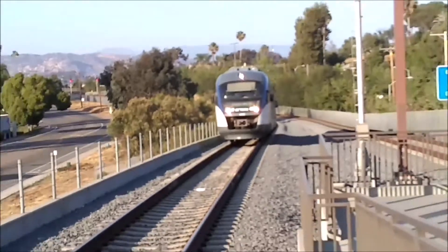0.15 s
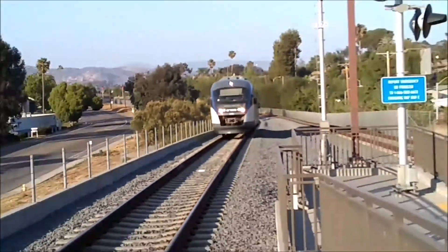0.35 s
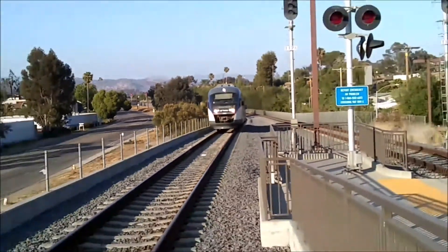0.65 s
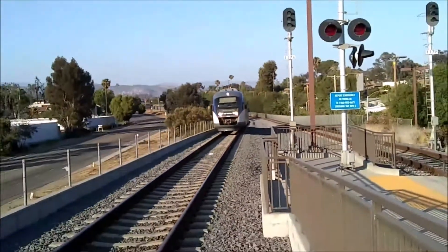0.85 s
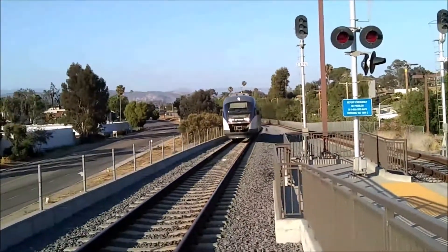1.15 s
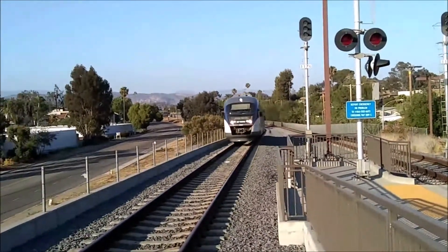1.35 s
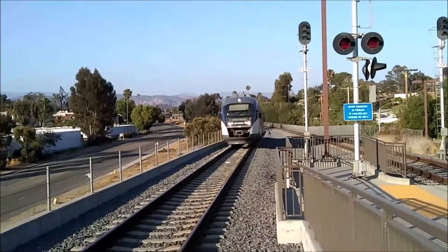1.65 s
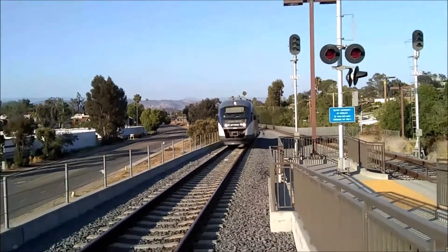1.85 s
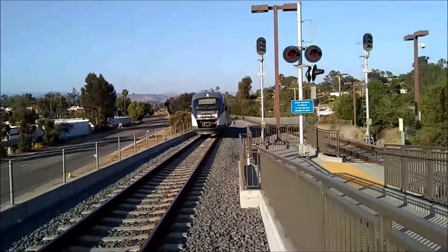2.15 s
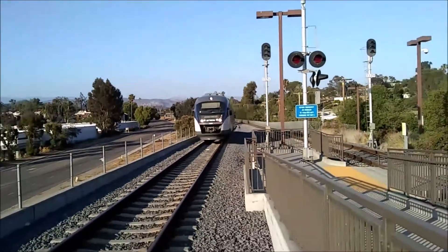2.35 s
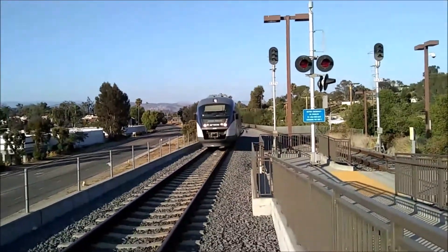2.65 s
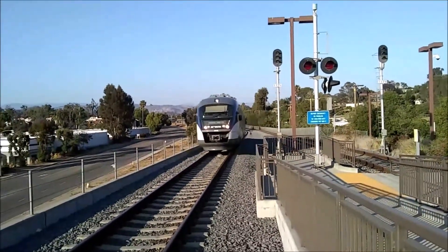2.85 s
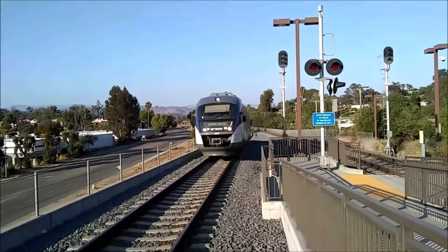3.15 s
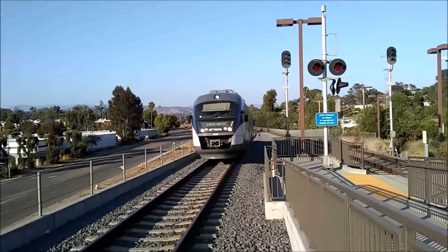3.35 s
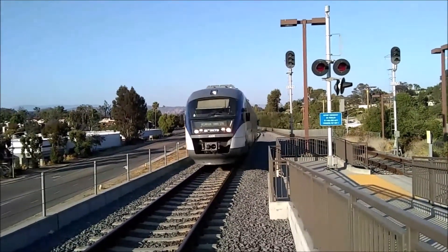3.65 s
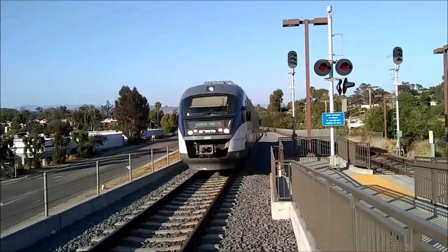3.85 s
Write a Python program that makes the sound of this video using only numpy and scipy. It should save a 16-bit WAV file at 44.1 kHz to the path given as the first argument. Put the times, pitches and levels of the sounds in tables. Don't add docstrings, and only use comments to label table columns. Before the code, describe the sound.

A train horn dominates the ending: a loud, brassy, mid-pitched blast from about 3.25 to 3.65 seconds, then a second from 3.7, still sounding at the cut, with dull faint echoes. Before it, wind thumps the microphone, mostly left, strongest near 0.5-1 second, over low diesel drone and distant traffic. Brief air hisses come around 2.3 and 2.9; rolling hiss and metallic wheel clatter swell from 2.4.

```python
import sys
import numpy as np
from scipy import signal
from scipy.fft import rfft, irfft, next_fast_len
from scipy.io import wavfile
from scipy.ndimage import uniform_filter1d

SR = 44100
rng = np.random.default_rng(int(sys.argv[2]) if len(sys.argv) > 2 else 0)


def voltage_ratio(level):
    return 10 ** (np.asarray(level, float) / 20)


def dump_mix(stems):
    frames = np.atleast_2d(stems).T
    limited = np.clip(frames, -1, 1)
    pcm = np.round(limited * 32767).astype(np.int16)
    wavfile.write(sys.argv[1], SR, pcm)


N = 176400


def rms_one(x):
    return x / np.sqrt(np.mean(x ** 2) + 1e-20)


def in_time(rows):
    s, *columns = np.transpose(rows)
    return [np.interp(np.arange(N) / SR, s, column) for column in columns]


def at_hz(points, hz):
    table_hz, values = np.transpose(points)
    return np.interp(np.log(hz), np.log(table_hz), values)


def pan(db):
    return voltage_ratio(np.multiply.outer([.5, -.5], db))


def filtered(x, order, hz, kind="low"):
    return signal.sosfilt(signal.butter(order, hz, kind, fs=SR, output="sos"), x)


def drift(rate):
    r = np.exp(-80 * np.pi * rate / SR)
    white = rng.standard_normal(N // 40 + 2002)
    slow = signal.lfilter([1], [1, -2 * r, r * r], white)[2000:]
    return np.interp(np.arange(N) / 40, np.arange(len(slow)), rms_one(slow))


def resonance(x, hz, width_hz):
    r = np.exp(-np.pi * width_hz / SR)
    poles = [1, -2 * r * np.cos(2 * np.pi * hz / SR), r * r]
    return signal.lfilter([(1 - r * r) / 2, 0, (r * r - 1) / 2], poles, x)


# (f/Hz, left-right likeness [-1..1])
LIKENESS = [(100, 1), (600, 0.66), (1300, -0.16), (2100, -0.66), (3200, 0.39), (4300, -0.33), (5600, 0.38),
            (8000, -0.19)]


def pair(white, hz):
    alike = np.clip(at_hz(LIKENESS, hz), -1, 1)
    common = np.sqrt(1 + alike) * white[0]
    opposed = np.sqrt(1 - alike) * white[1] * np.array([[1], [-1]])
    return common + opposed


def banded_noise(spectrum, pan_db=0):
    patchy_db = .7
    out, together = 0, drift(6)
    edges = 40 * 2 ** np.arange(0, 8.9, .4)
    white = rng.standard_normal((2, 2, N))
    for k, (low, high) in enumerate(zip(edges, edges[1:])):
        band = filtered(white[k % 2], 2, [low, high], "band")
        hz = np.sqrt(low * high)
        level_db = at_hz(spectrum, hz) + patchy_db * (0.5 * together + drift(18))
        sides = pan(pan_db * min(hz / 10000, 1) + np.zeros(N))
        out = out + voltage_ratio(level_db) * pair(band, hz) * sides
    return rms_one(out)


# (t/s, level/dB, left port over right/dB)
GUSTS = [(0, -49.5, 6), (.2, -49.5, 14), (.35, -60.5, -3), (.86, -43.5, 10), (1.1, -54, 9),
         (1.4, -46.5, -6), (1.75, -46, 15), (2.05, -50.5, -9.5), (2.3, -49.5, -1), (2.75, -50, -2),
         (3.1, -49.5, -6), (3.4, -53.5, 11.5), (4.0, -64.5, 1)]
# (f/Hz, level/dB per Hz)
WIND = [(20, -33.5), (45, -2), (90, -2.5), (170, -8), (300, -18.5), (600, -47.5), (1200, -50),
        (2500, -85.5)]
WIND_GAIN_DB, WIND_LUMP_DB, WIND_LUMPS_PER_S = 18.5, 3.2, 30


def wind():
    level_db, pan_db = in_time(GUSTS)
    lumps = np.array([voltage_ratio(WIND_LUMP_DB * drift(WIND_LUMPS_PER_S)) for side in (0, 1)])
    hz = np.maximum(np.arange(N // 2 + 1) * SR / N, 1)
    low = irfft(rfft(lumps * rng.standard_normal((2, N))) * voltage_ratio(at_hz(WIND, hz)), N)
    return rms_one(low) * voltage_ratio(level_db + WIND_GAIN_DB) * pan(pan_db)


# (f/Hz, level/dB per Hz)
TRAFFIC = [(60, 2.5), (250, -1), (700, -10), (1500, -15.5), (3500, -28.5), (7000, -27), (10000, -58.5),
           (14000, -52.5)]


def traffic():
    return voltage_ratio(-42.5) * banded_noise(TRAFFIC)


# (t/s, level/dB)
NEAR = [
    (0, -67),
    (2.1, -69),
    (2.48, -57.5),
    (2.58, -66.5),
    (2.75, -57),
    (2.88, -50),
    (3.3, -49.5),
    (3.45, -54),
    (3.75, -49),
    (4.0, -50.5),
]
# (f/Hz, level/dB per Hz)
ROLLING = [(300, 6), (650, -13), (1300, -11.5), (2200, -12.5), (4000, -15.5), (7000, -14), (11000, -16.5),
           (13500, -34.5)]
ROLLING_GAIN_DB, ROLLING_PAN_DB, ROLLING_PAN_DB_PER_S = 12, -0.5, -8


def rolling():
    near_db, = in_time(NEAR)
    t = np.arange(N) / SR
    pan_db = ROLLING_PAN_DB + ROLLING_PAN_DB_PER_S * np.maximum(t - 2.9, 0)
    return voltage_ratio(near_db + ROLLING_GAIN_DB) * banded_noise(ROLLING, pan_db)


# (f/Hz, width/Hz, level/dB, share of nearness)
DRONES = [(105.2, 25, -31, 0.032), (205.2, 33.6, -40.5, 0.071), (600.6, 37.7, -50.5, 0.7),
          (1318.4, 32, -59.5, 0.16), (2020, 240, -61, 0.1), (3680, 130, -68, 1.0), (4500, 500, -65, 1.5)]


def drones():
    near_db, = in_time(NEAR)
    out = np.zeros((2, N))
    for hz, width_hz, db, share in DRONES:
        noise = pair(rng.standard_normal((2, N)), hz)
        tone = resonance(resonance(noise, hz, width_hz), hz, width_hz)
        out += voltage_ratio(db + share * (near_db - near_db.mean())) * rms_one(tone)
    return out


# (t/s, peak level/dB, cycle/ms)
THUMPS = [(0.515, -13, 8.6), (.553, -14.5, 3.3), (0.552, -8.5, 13), (0.697, -14.5, 20), (.742, -13, 6.8),
          (0.8, -14, 4.4), (0.825, -17, 4.4), (.840, -7, 8.7), (0.854, -16.5, 2.8), (.893, -11, 7.3),
          (0.903, -9, 3.2), (.912, -11.5, 3.6), (.958, -22.5, 3.1), (0.973, -7, 4.1), (.984, -5, 9.8),
          (.996, -15, 9.9), (1.383, -24, 2.1), (1.416, -21, 1.4), (1.480, -14.5, 6.3), (1.959, -13, 10.8),
          (2.099, -17.5, 5.3), (2.114, -11, 9.9), (2.226, -23, 4), (2.274, -14, 5.7), (2.341, -21, 5.4),
          (2.434, -15, 4.7), (2.516, -13, 4.9), (2.547, -17.5, 5.7), (2.692, -16, 6), (3.068, -19, 20),
          (3.165, -10.5, 6.3), (3.207, -9, 4.7), (3.29, -8.5, 5.7), (3.327, -6.5, 5.6)]
# (t/s, peak level/dB, half width/s, f/Hz)
FLUTTERS = [
    (1.415, -18, 0.029, 58),
    (1.58, -29, .04, 64.7),
    (1.7, -16, 0.094, 66),
    (1.825, -22, 0.033, 58),
    (2.23, -23, .03, 74),
]
THUMP_GAIN_DB, THUMP_CYCLES, THUMP_PAN_DB, THUMP_CUT_HZ = 7.5, 1.0, 40, 520


def thumps():
    out = np.zeros(N + SR)
    for s, db, cycle_ms in THUMPS:
        u = np.arange(int(3 * SR * cycle_ms / 1000)) * 1000 / cycle_ms / SR
        decay = np.exp(-u * np.log(10) / THUMP_CYCLES)
        push = -np.sin(2 * np.pi * u) * decay * (1 - np.exp(-(6 * u) ** 2))
        i = int((s - .001) * SR)
        out[i:i + len(u)] += voltage_ratio(db + THUMP_GAIN_DB) * push
    t = np.arange(N) / SR
    for s, db, width_s, hz in FLUTTERS:
        swell = np.exp(-((t - s) / width_s) ** 2)
        out[:N] += voltage_ratio(db) * swell * np.sin(2 * np.pi * hz * (t - s))
    soft = filtered(out[:N] + 1e-18, 3, THUMP_CUT_HZ)
    return soft * voltage_ratio(np.array([[0], [-THUMP_PAN_DB]]))


# (t/s, peak level/dB, half width/s)
PUFFS = [
    (1.2, -61, 0.018),
    (2.28, -49.5, .018),
    (2.36, -48, 0.033),
    (2.47, -60, 0.018),
    (2.875, -42.5, .01),
]


def puffs():
    t = np.arange(N) / SR
    hiss = filtered(rng.standard_normal((2, N)), 2, [5170, 9000], "band")
    swells = sum(voltage_ratio(db) * np.exp(-((t - s) / width_s) ** 2) for s, db, width_s in PUFFS)
    return rms_one(hiss) * swells


# (t/s, peak level/dB, ring f/Hz, t60/s)
KNOCKS = [(2.408, -16, 210.4, 0.15), (2.634, -36, 578, 0.14), (2.668, -31, 589, 0.064),
          (2.79, -34, 584, 0.089), (2.813, -32, 620, 0.054), (2.829, -26.5, 592, 0.073),
          (2.85, -27, 720, .04), (2.875, -27, 730, 0.038), (2.891, -16, 983, 0.026), (2.903, -26, 713, .04),
          (2.941, -37, 1297, 0.1), (2.954, -23, 557, 0.03), (2.978, -24, 609, 0.048),
          (3.0, -19.5, 597, 0.051), (3.02, -29.5, 674, 0.064), (3.045, -30, 650, 0.036),
          (3.06, -23, 763, 0.054), (3.06, -27.5, 990, .04), (3.075, -29.5, 591, 0.15),
          (3.119, -24.5, 616, 0.092), (3.127, -33, 920, .03), (3.147, -25.5, 594, 0.061),
          (3.165, -27, 622, 0.05), (3.183, -28, 594, 0.077), (3.203, -34, 595, 0.059),
          (3.228, -32.5, 890, 0.043)]
KNOCK_RISE_S = 0.0036


def knocks():
    t = np.arange(N) / SR
    out = np.zeros(N)
    for s, db, hz, t60 in KNOCKS:
        u = np.maximum(t - s, 0)
        rise = 1 - np.exp(-(u / KNOCK_RISE_S) ** 2)
        out += voltage_ratio(db - 60 * u / t60) * rise * np.sin(2 * np.pi * hz * u)
    return out


# (t/s, level/dB)
CHATTER = [
    (2.6, -71),
    (2.8, -62),
    (2.95, -48),
    (3.2, -45.5),
    (3.4, -61),
    (4.0, -53),
]
# (f/Hz, level/dB, t60/s)
RAIL = [(601, 3.5, 0.056), (638, 0, 0.015), (734.6, 0, 0.15), (783, -5, 0.1), (1000, -4, 0.021),
        (1310, -6.5, 0.02), (1910, -24.5, 0.045), (2240, -36, 0.12)]
CHATTER_PER_S, CHATTER_UNEVEN_DB, RAIL_LAG_S = 600, 3, .00022


def chatter():
    level_db, = in_time(CHATTER)
    out = 0
    for hz, db, t60 in RAIL:
        struck = rng.random(N) < CHATTER_PER_S / len(RAIL) / SR
        clicks = struck * voltage_ratio(CHATTER_UNEVEN_DB * np.minimum(rng.exponential(1, N), 4))
        soft = resonance(clicks + 1e-18, hz, 100)
        r, w = voltage_ratio(-60 / (t60 * SR)), 2 * np.pi * hz / SR
        ring = signal.lfilter([0, np.sin(w)], [1, -2 * r * np.cos(w), r * r], soft)
        out = out + voltage_ratio(db) * rms_one(ring) * pan(rng.normal(0, 2.0))[:, None]
    return voltage_ratio(level_db) * np.array([out[0], np.roll(out[1], int(RAIL_LAG_S * SR))])


# (t/s, fundamental level/dB, brightness/dB, left lead of fundamental/rad)
BLASTS = [
    [(3.23, -32.5, -65, -0.66), (3.278, -17.5, -57, -0.49), (3.312, -11, -39, -0.56),
     (3.34, -15, -22, -0.59), (3.392, -13.5, -22, -0.68), (3.464, -14.5, -27.5, -0.77),
     (3.536, -13, -35, -0.87), (3.63, -15.5, -46, -0.89), (3.665, -13, -66, -0.7)],
    [(3.698, -13.5, -51.5, -0.85), (3.735, -13, -31, -0.79), (3.765, -13, -24.5, -0.82),
     (3.798, -15.5, -18, -0.87), (3.85, -14, -24, -0.76), (3.905, -13.5, -31, -0.67),
     (4.0, -11.5, -29.5, -0.46)],
]
# (first blast level/dB, second blast level/dB, share of brightness, left over right/dB, left lead/rad)
PARTIALS = [(-1, -0.5, 0.15, 0, 0), (-8, -8.5, 0.51, 3, -0.32), (-11.5, -7.5, 0.8, 3.5, 1.48),
            (-13, -11.5, 1.1, -14, 0.5), (-14.5, -24, 1.4, 0, -0.5), (-33.5, -32.5, 0.63, 19, 12.5),
            (-24, -34, 2, -9, 1), (-28, -31.5, 1.3, -12, 4), (-19, -25, 2.37, -16.5, -2),
            (-28, -29, 1.64, 13.5, 3), (-47.5, -47, 0.43, 13, 6.5), (-45, -37, 0.4, -13, -5.5),
            (-39, -31.5, 0.52, -10.5, -2.5), (-43, -30.5, 1.23, -6, 0.5), (-57, -51, 1.1, -7, 3.8)]
# (t/s, level/dB)
EDGE = [(0, -120), (3.23, -59), (3.285, -47), (3.315, -29.5), (3.35, -21), (3.392, -23), (3.464, -34.5),
        (3.55, -37.5), (3.665, -48.5), (3.71, -40), (3.74, -27), (3.765, -23), (3.8, -21), (3.85, -25.5),
        (3.905, -31), (4.0, -31)]
# (delay/s, level/dB, left over right/dB)
ECHOES = [
    (0.048, -24, -2),
    (0.114, -25.5, -4),
    (.19, -30, -1),
]
HORN_HZ, HORN_GAIN_DB, HORN_SPREAD, HORN_BREATH_DB = 365.26, 3.5, 1.13, -55
BRIGHT_TOP_DB, EDGE_FROM, SECOND_BLAST_S, ECHO_CUT_HZ = -16.5, 5, 3.67, 2300
SLACK_BELOW_DB, SLACK_SHARP_HZ, ONSET_SHARP_HZ = -34, 2.0, .8
AIR_WOBBLE_DB, AIR_WOBBLE_RAD, PORTS_APART = .9, .035, .4


def horn():
    before = [(0, -120, -120, 0), (3.2, -60, -90, -0.42)]
    level_db, bright_db, low_lead = in_time(before + [row for blast in BLASTS for row in blast])
    t, out = np.arange(N) / SR, np.zeros((2, N))
    second = np.clip((t - SECOND_BLAST_S) / 0.033, 0, 1)
    bright_db = uniform_filter1d(bright_db, size=700)
    edge_db = uniform_filter1d(in_time(EDGE)[0], size=700)
    slack = np.clip((SLACK_BELOW_DB - bright_db) / 8, 0, 1)
    rising = uniform_filter1d(np.clip(np.gradient(bright_db) * SR / 600, 0, 1), size=900)
    pitch_hz = HORN_HZ + ONSET_SHARP_HZ * rising + SLACK_SHARP_HZ * slack
    turn = 2 * np.pi * np.cumsum(pitch_hz) / SR
    for k, (first_db, second_db, share, pan_db, lead) in enumerate(PARTIALS, 1):
        air, apart = drift(13.6), PORTS_APART * drift(3.2)
        drive_db = bright_db if k < EDGE_FROM else edge_db
        partial_db = first_db + second * (second_db - first_db) + share * (drive_db - BRIGHT_TOP_DB)
        wobble_db = AIR_WOBBLE_DB * min(k - .75, 2) * air
        size = voltage_ratio(level_db + HORN_GAIN_DB + partial_db + wobble_db)
        port_lead = low_lead if k == 1 else lead
        for side in (0, 1):
            waver = AIR_WOBBLE_RAD * k * (air + apart * (1 - 2 * side))
            phase = k * turn + HORN_SPREAD * k * np.log(k) + port_lead * (.5 - side) + waver
            out[side] -= np.sqrt(2) * size * pan(pan_db)[side] * np.cos(phase)
    dull = filtered(out, 2, ECHO_CUT_HZ)
    for s, db, pan_db in ECHOES:
        lag = int(s * SR)
        out[:, lag:] += voltage_ratio(db) * pan(pan_db)[:, None] * dull[:, :N - lag]
    breath = rms_one(resonance(rng.standard_normal(N), 150, 300))
    return out * (1 + voltage_ratio(HORN_BREATH_DB) * breath)


def scene():
    railcar = rolling() + drones() + knocks() + chatter() + horn()
    return wind() + traffic() + thumps() + puffs() + railcar


def roll_off(x):
    return signal.sosfilt(signal.butter(12, 14120, fs=SR, output="sos"), x)


PORT_PEAK_HZ, PORT_PEAK_WIDTH_HZ, PORT_PEAK_DB = 5535, 306, 3
CROSS_LAG_S, CROSS_SHARE, CROSS_CUT_HZ, CROSS_ORDER = .000443, .975, 5600, 6
CROSS_BASS_HZ, CROSS_BASS_LOSS, LIMIT = 250, .17, .95


def record(dry):
    x = dry + voltage_ratio(PORT_PEAK_DB) * resonance(dry, PORT_PEAK_HZ, PORT_PEAK_WIDTH_HZ)
    size = next_fast_len(N + 512)
    hz = np.arange(size // 2 + 1) * SR / size
    share = CROSS_SHARE - CROSS_BASS_LOSS / (1 + (hz / CROSS_BASS_HZ) ** 2)
    dulled = share / (1 + (hz / CROSS_CUT_HZ) ** CROSS_ORDER)
    cross = dulled * np.exp(-2j * np.pi * hz * CROSS_LAG_S)
    x = x - irfft(rfft(x[::-1], size) * cross, size)[:, :N]
    x = x / (1 + (np.abs(x) / LIMIT) ** 8) ** (1 / 8)
    return roll_off(x)


dry = scene()
out = record(dry)
dump_mix(out)
```